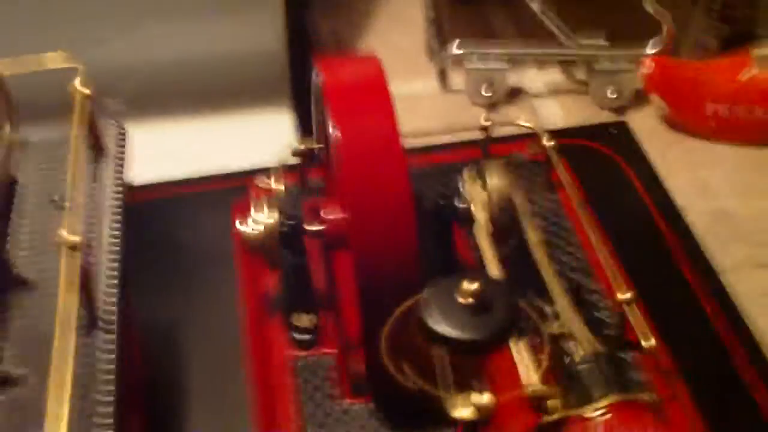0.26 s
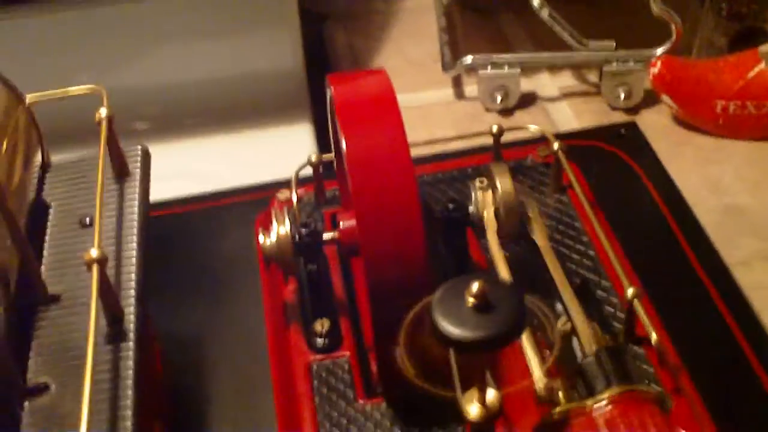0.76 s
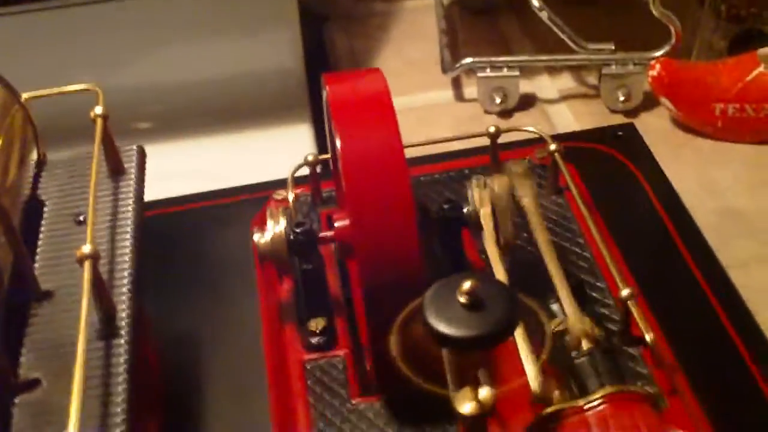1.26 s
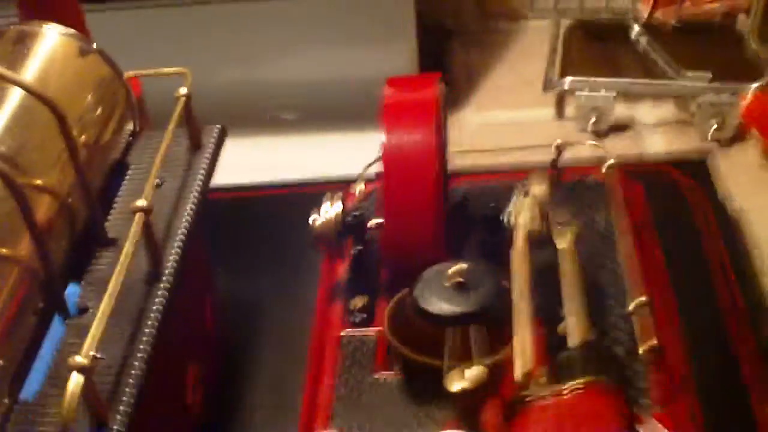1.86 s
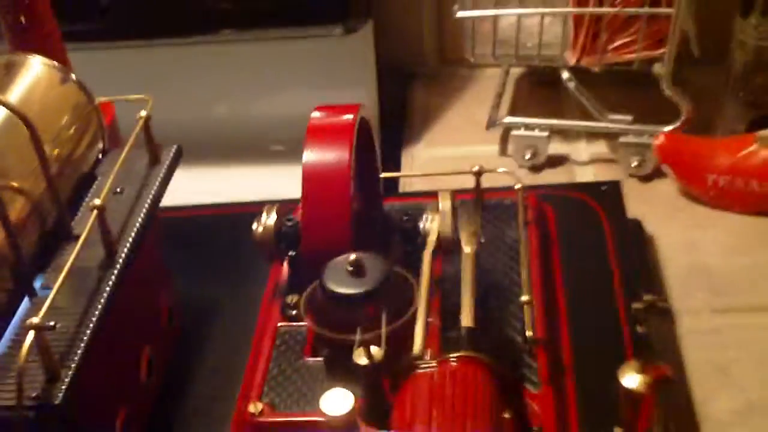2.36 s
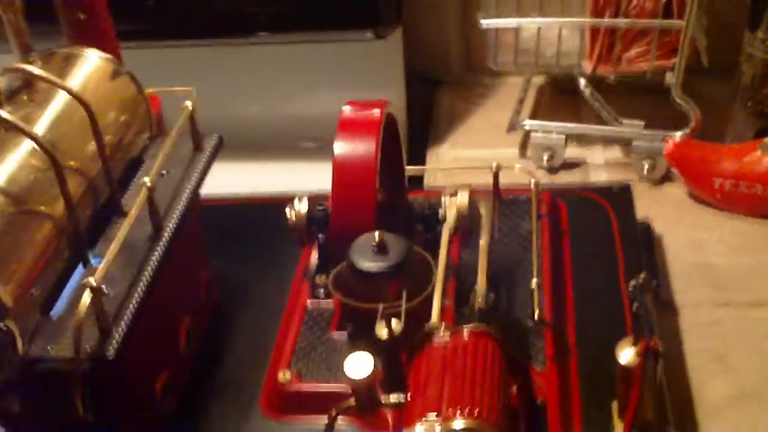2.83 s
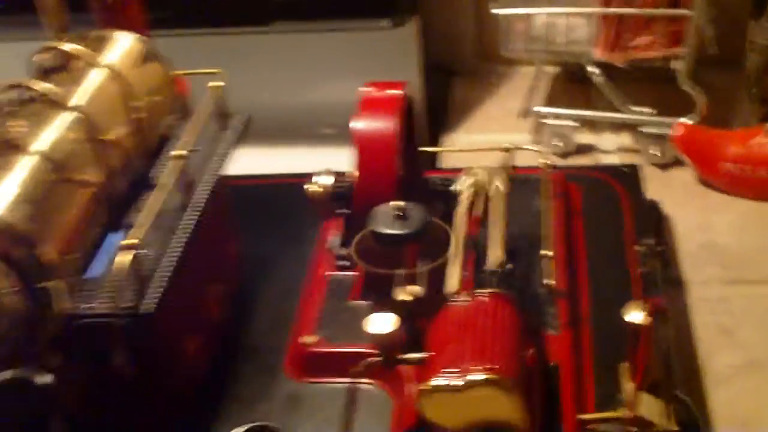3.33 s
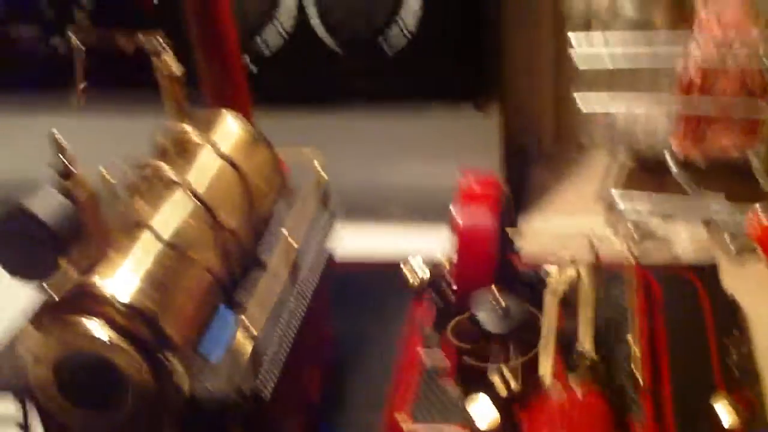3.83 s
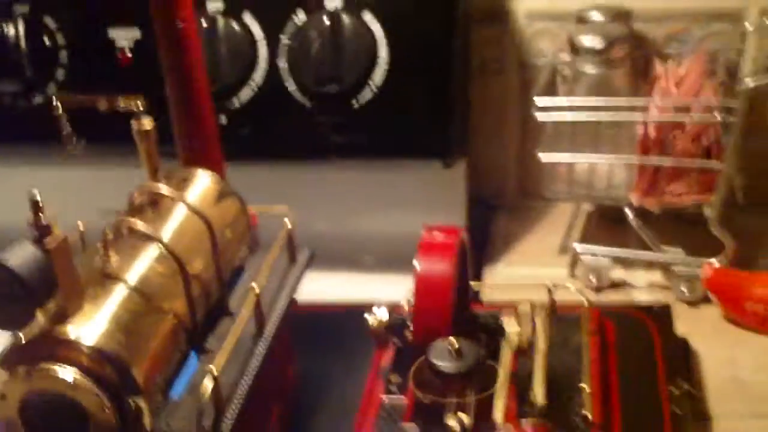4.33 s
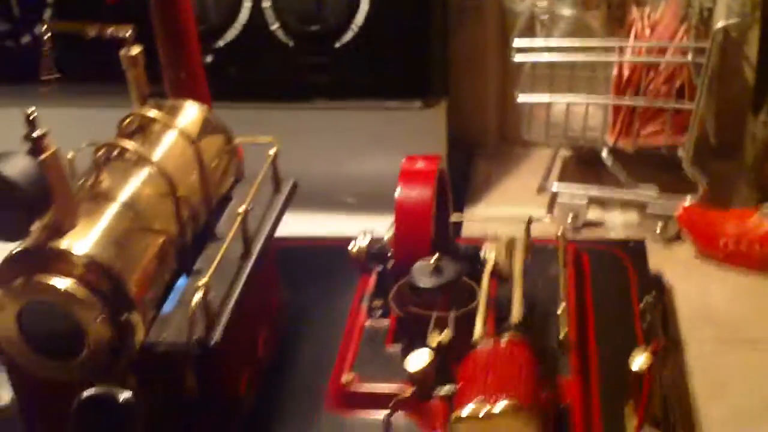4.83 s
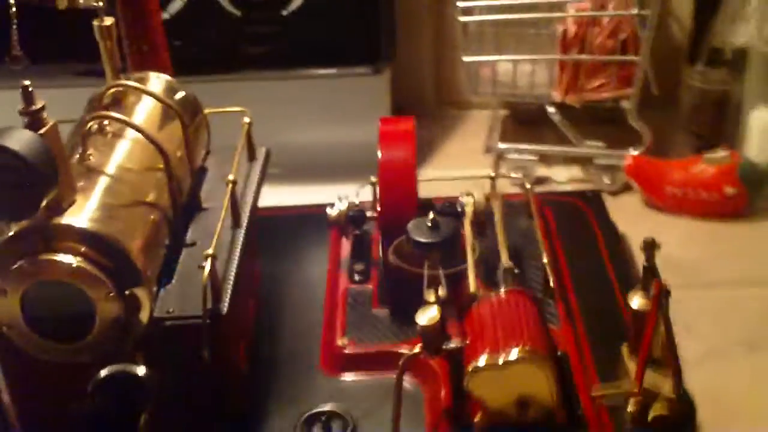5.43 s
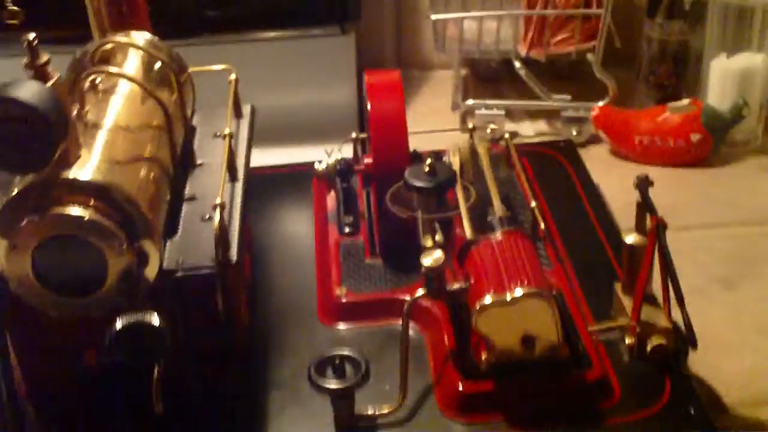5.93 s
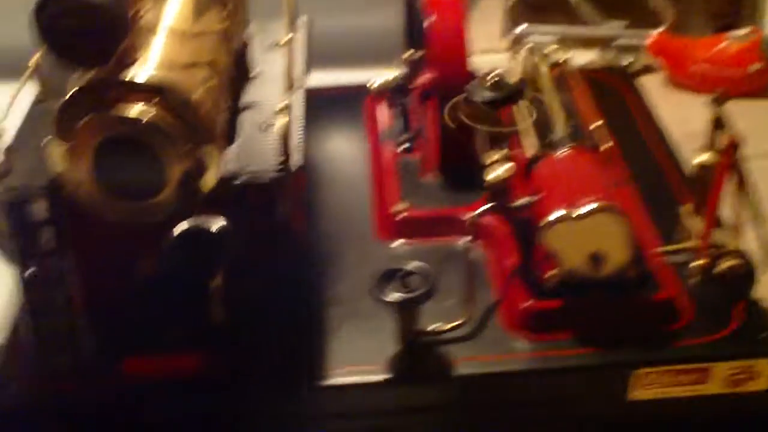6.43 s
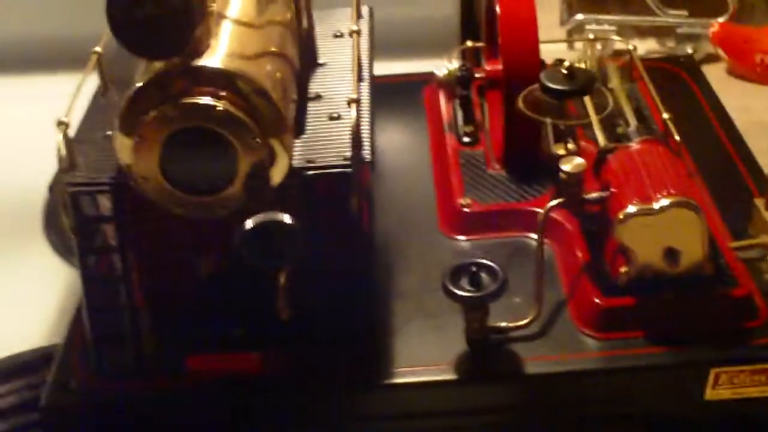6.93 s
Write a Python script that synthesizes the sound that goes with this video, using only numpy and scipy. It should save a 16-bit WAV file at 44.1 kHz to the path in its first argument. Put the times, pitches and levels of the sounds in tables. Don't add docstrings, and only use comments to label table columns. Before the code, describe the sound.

Close handheld phone, hard-walled kitchen: two short, overloaded high whistle toots with hissing steam come in the first second, a weak breathy puff between them. The much quieter toy engine, briefly ducked by the toots, then carries on to the end: low tinny rumble, soft steam hiss, fast even knocking of brass linkage, faint motor and mains hum, slightly nearer toward the close.

```python
import sys
import numpy as np
from scipy import signal
from scipy.fft import rfft, irfft, next_fast_len
from scipy.io import wavfile
from scipy.ndimage import uniform_filter1d

SR = 44100
rng = np.random.default_rng(int(sys.argv[2]) if len(sys.argv) > 2 else 0)


def wav_out(sig):
    wavfile.write(sys.argv[1], SR, np.round(np.clip(np.atleast_2d(sig).T, -1, 1) * 32767).astype(np.int16))


def gain_from_db(level_db):
    decades = np.asarray(level_db, float) / 20
    return 10 ** decades


N = 317079


def ramp(times_s, values):
    return np.interp(np.arange(N) / SR, times_s, values)


def curve(table, column=1):
    table = np.array(table)
    return ramp(table[:, 0], table[:, column])


def unit(x):
    return x / np.sqrt(np.mean(x ** 2))


def butter(x, order, hz, kind="low", rate_hz=SR):
    return signal.sosfilt(signal.butter(order, hz, kind, fs=rate_hz, output="sos"), x)


def walk(rate_hz):
    hold = int(SR / rate_hz)
    held = np.repeat(rng.standard_normal(N // hold + 1), hold)
    return unit(uniform_filter1d(uniform_filter1d(held, hold), hold)[:N])


def bursts(events, edge_ms):
    out = np.zeros(N)
    for start_s, length_ms, db in events:
        a, b = int(max(start_s, 0) * SR), int((start_s + length_ms / 1000) * SR)
        out[a:b] = np.maximum(out[a:b], gain_from_db(db))
    edge = max(int(edge_ms * SR / 1000), 1)
    return uniform_filter1d(uniform_filter1d(out, edge), edge)


def noise_spectrum(colour):
    hz, db = np.transpose(colour)
    bins_hz = np.arange(N // 2 + 1) * SR / N + 1
    noise = rfft(rng.standard_normal(N)) * gain_from_db(np.interp(np.log(bins_hz), np.log(hz), db))
    return noise / np.std(irfft(noise, N))


LOUD = (0, 3)


def ducked(back_s):
    hold_s = 0.097
    ducks = []
    for _, full, _, shuts, _ in np.array(BLASTS)[list(LOUD)]:
        ducks.append(ramp([full - .02, full, shuts + hold_s, shuts + hold_s + back_s], [0, 1, 1, 0]))
    return np.max(ducks, axis=0)


# multiple of shaft rate, level in dB.
FAN_LINES = [(1, -23), (3, -21), (4, -15), (5, -16), (6, -27), (8, -27), (9, -22), (10, -26), (11, -10),
             (12, -26), (13, -18), (14, -11), (15, -11), (16, -16), (17, -28), (18, -20), (21, -28)]
# frequency in Hz, level in dB.
MAINS_LINES = [(120, -25), (240, -30), (360, -14), (480, -30), (720, -28)]


def motors():
    fan_hz = 57.925
    lines = [(k * fan_hz, db) for k, db in FAN_LINES] + list(MAINS_LINES)
    t = np.arange(N) / SR
    out = np.zeros(N)
    for hz, db in lines:
        level = 2 ** .5 * gain_from_db(db - 1.0 + 3.3 * walk(3.5))
        out += level * np.sin(2 * np.pi * (hz * t + rng.random()))
    return out


# share of turn 0-1, level in dB.
KNOCKS = [
    (0, 0),
    (.5, -3.5),
    (.83, -11),
]
# frequency in Hz, level in dB per Hz.
KNOCK_COLOUR = [(700, -30), (1400, -10), (1900, -4), (2800, 0), (3300, -2), (4000, -14), (4900, -5),
                (5600, -9), (7000, -22), (10000, -40)]


def linkage():
    turn_hz, first_s, jitter_s = 5.7465, -.001, 0.001466
    turns = np.arange(1, int(N / SR * turn_hz))
    blows = np.zeros(N)
    for share, db in KNOCKS:
        at_s = first_s + (turns + share) / turn_hz + jitter_s * rng.standard_normal(len(turns))
        blows[(at_s * SR).astype(int)] = gain_from_db(db + .6 * rng.standard_normal(len(turns)))
    t = np.arange(4000) / SR
    decay = np.clip(t / .003, 0, 1) * (np.exp(-t / .007) + .6 * np.exp(-t / .022))
    scuff = signal.fftconvolve(blows, decay)[:N] * irfft(noise_spectrum(KNOCK_COLOUR), N)
    return unit(butter(scuff, 2, 6000))


# frequency in Hz, level in dB per Hz.
BODY = [(18, -40), (30, -26.5), (217, -11.5), (397, -6.5), (885, -3), (1580, -14), (2730, -17.5),
        (3880, -25), (6740, -27.5), (9110, -30.5), (12000, -39), (15600, -86), (22000, -120)]
# centre in Hz, width in Hz, gain in dB.
TIN = [(99, 30, 5), (226.7, 73, 7), (265, 28, -4.5), (394.5, 30, -2), (557, 38, 4), (730, 60, 3),
       (784, 27.7, -5.5), (835, 69.6, 2), (930.5, 40, 2.5), (1014, 38, -6), (1040, 25, 3.5),
       (1796, 81, 5.5), (2740, 290, -0.5), (3980, 360, 0), (4611, 400, 4), (5270, 400, -5), (6470, 1500, 5),
       (929, 9, 5), (3880, 54.6, -8), (10100, 700, 2), (10310, 120, -11.5)]
# time in seconds, nearness in dB.
NEAR = [
    (0, 3.5),
    (.5, 1.5),
    (1.5, 0.95),
    (3.35, -0.5),
    (3.5, 1.5),
    (4.2, 0.9),
    (4.5, 2.5),
    (7.19, 3),
]


def running():
    hz = np.arange(N // 2 + 1) * SR / N + 1
    tin_db = sum(db / (1 + (2 * (hz - f) / width) ** 2) for f, width, db in TIN)
    noise = noise_spectrum(BODY) * gain_from_db(tin_db)
    near = curve(NEAR)
    bright_duck = -10.5 * ducked(back_s=0.38)
    rumble_db = near - 9 * ducked(back_s=0.26)
    rattle_db = 0.98 * near + bright_duck
    hiss_db = 1.1 * near + bright_duck
    out, swell = 0, walk(4)
    for centre_hz in 28 * 2 ** np.arange(0, 9, 1 / 3):
        octaves = np.log2(hz / centre_hz)
        band = irfft(noise * np.cos(np.pi / 2 * np.clip(3 * octaves, -1, 1)) ** 2, N)
        near_db = hiss_db if centre_hz > 3900 else rattle_db if centre_hz > 1450 else rumble_db
        out = out + band * gain_from_db(near_db + 0.66 * swell + 0.48 * walk(7))
    knocks = gain_from_db(rattle_db - 15.2) * linkage()
    return gain_from_db(-45) * (gain_from_db(0.95) * out + knocks + gain_from_db(rumble_db) * motors())


def echo_gain():
    under_db, rebound_db, settle_s = -10, 4, 0.023
    t, db = np.arange(N) / SR, -10.5
    for opens, _, eases, shuts, _ in np.array(BLASTS)[list(LOUD)]:
        ends = shuts - .22 * (shuts - eases)
        db = db + under_db * ramp([opens, opens + .01, ends - .01, ends], [0, 1, 1, 0])
        rebound = ramp([ends - .01, ends], [0, 1]) * np.exp(-np.maximum(t - ends, 0) / settle_s)
        db = db + rebound_db * rebound
    slip_s, recovery_s, dip_db, lasting_db = .866, .022, -13, 0
    return db + ramp([slip_s, slip_s + .006, slip_s + .006 + recovery_s], [0, dip_db, lasting_db])


def kitchen_echo(dry):
    t = np.arange(SR // 3) / SR
    decay = 1000. ** (-t / 0.59) + 2.455 * 1000. ** (-t / 0.16)
    room = rng.standard_normal(len(t)) * decay * np.clip(t / 0.01, 0, 1)
    room = room / np.sqrt(np.sum(room ** 2))
    octave = dry ** 2 - uniform_filter1d(dry ** 2, size=48)
    sideways = dry + gain_from_db(-22) * octave
    pressure = sum(ramp([o, f, e, s], [0, 1, 1, 0]) for o, f, e, s, _ in BLASTS)
    beamed = sideways * gain_from_db(-4 * pressure)
    echo = butter(signal.fftconvolve(beamed, room)[:N], 1, 7000)
    return gain_from_db(echo_gain()) * echo


def wheeze():
    breath = unit(butter(rng.standard_normal(N), 2, (3300, 3600), "band"))
    return gain_from_db(-41.5 + ramp([.284, .292, .326, .526], [-50, 0, 0, -44.55])) * breath


# start in seconds, length in ms, level in dB.
PUFFS = [
    (0, 52.7, -24.5),
    (.282, 10, -41),
    (.292, 44.3, -37),
    (.625, 29, -35.5),
    (.655, 68, -26),
    (.725, 22, -37.5),
]
# frequency in Hz, level in dB per Hz.
LIP = [(900, -46.5), (1500, -18.5), (3000, -15), (3900, -17), (4700, -10.5), (5200, -19.5), (6500, -2),
       (7400, -12.5), (8400, -18), (10700, -18.5), (12000, -25.5), (15000, -59)]


def steam():
    gust = bursts(PUFFS, edge_ms=9.5)
    pole = 1 / (.03 * SR)
    gust = gust + .15 * signal.lfilter([pole], [1, pole - 1], gust)
    return gust * gain_from_db(1.5 * walk(150)) * irfft(noise_spectrum(LIP), N)


# time in seconds, pitch in Hz, level in dB.
SQUEAL = [
    (0, 11740, -13),
    (.008, 11720, -15),
    (.012, 11530, -18),
    (.033, 11450, -18),
    (.045, 11450, -45),
]


def valve_squeal():
    level = gain_from_db(curve(SQUEAL, column=2) + 2.0 + 1.5 * walk(400))
    tone = np.sin(2 * np.pi * np.cumsum(curve(SQUEAL)) / SR)
    return level * tone * (np.arange(N) < .05 * SR)


# valve opens, full pressure, eases, shuts, all in seconds, top pitch in Hz.
BLASTS = [
    (-.025, .015, .045, .068, 4739),
    (.278, .292, .322, .345, 4600),
    (.62, .626, .63, .65, 4650),
    (.641, .685, .705, .762, 4633),
]
# time in seconds, level in dB over full scale.
TONE = [
    [(0, -17), (.012, -14), (.023, -2), (.052, -2.5), (.067, -5), (.071, -40)],
    [(.279, -60), (.282, -37), (.289, -37), (.293, -60), (.326, -60), (.33, -36), (.338, -36), (.342, -60)],
    [(.625, -50), (.628, -30), (.635, -30), (.638, -50)],
    [(.637, -40), (.645, -3.5), (.654, -2), (.661, -5), (.665, -1), (.72, -1.5), (.741, -4), (.76, -16),
     (.767, -40)],
]
# start in seconds, length in ms, level in dB.
SURGES = [(.0246, 4.4, 3), (.0295, 5, -.3), (.0352, 1, .8), (.038, 1.2, .8), (.040, 4.8, 3),
          (.6543, .7, .5), (.6655, .8, .6), (.6686, 3.4, 2), (.6738, 1.8, .6), (.6807, .8, .8),
          (.6828, 14, 3), (.699, 13, 3), (.7125, 3, .3), (.716, 3, 1.5)]


def pipe():
    sag_hz = 570
    beat_share, beat_depth, beat_starts = .75, .85, (.55, 0, 0, .1)
    out, surge = 0, bursts(SURGES, edge_ms=.2)
    for (opens, full, eases, shuts, top_hz), level, start in zip(BLASTS, TONE, beat_starts):
        rise, fall = ramp([opens, full], [1, 0]), ramp([eases, shuts], [0, 1])
        pitch_hz = top_hz - sag_hz * (rise + fall) ** 2 + 4 * walk(300)
        phase = 2 * np.pi * np.cumsum(pitch_hz) / SR
        turns = start + beat_share * np.cumsum(sag_hz * fall ** 2) / SR
        beat = 1 - beat_depth * np.minimum(5 * fall, 1) * (1 - np.abs(np.cos(np.pi * turns)))
        sputter_db = 5 * (opens < 0) * np.minimum(4 * rise, 1) * walk(500)
        tone = gain_from_db(curve(level) + .5 * walk(400) + sputter_db) * beat
        first, last = level[0][0], level[-1][0]
        inside = ramp([first - .001, first, last, last + .001], [0, 1, 1, 0])
        blow = inside * np.maximum(tone, surge)
        out = out + blow * (np.sin(phase) + gain_from_db(-35) * blow * np.sin(2 * phase))
    return out


def whistle():
    dry = pipe() + steam() + wheeze() + valve_squeal()
    return dry + kitchen_echo(dry)


def scene():
    return (gain_from_db(2) * running() + whistle())[None]


def drop_masked(x, quiet_db, near_db, slope_db):
    z = signal.stft(x, nperseg=512)[2]
    fine_power = np.abs(z[:256]) ** 2
    power = fine_power.reshape(64, 4, -1).sum(axis=1)
    above = np.subtract.outer(np.arange(64), np.arange(64))
    spread = np.where(above > 0, gain_from_db(near_db - slope_db * above), 0) ** 2
    spread = spread + gain_from_db(quiet_db) ** 2 * (np.arange(64)[:, None] > 15)
    shift = gain_from_db(7 * rng.standard_normal((power.shape[1] // 5 + 1, 64)))
    shift = np.repeat(shift, 5, axis=0).T[:, :power.shape[1]]
    bar = np.repeat(shift * (spread @ power), 4, axis=0)
    keep = 4 * uniform_filter1d(fine_power, size=3, axis=1) > bar
    return signal.istft(z * np.vstack([keep, keep[-1:]]), nperseg=512)[1][:len(x)]


def low_pass(x):
    return signal.sosfilt(signal.butter(12, 15900, fs=SR, output="sos"), x)


def record(dry):
    hold_hz, top_hz = 24000, 15290
    x = signal.resample_poly(dry[0], hold_hz // 300, SR // 300)
    envelope = np.abs(signal.hilbert(x, next_fast_len(len(x)))[:len(x)])
    reach = uniform_filter1d(envelope, size=6)
    x = x * np.minimum(1, 1.1 / (reach + 1e-9))
    overflow = (x + 1) % 2 - 1 - x
    bass_cut = signal.butter(1, 190, "high", fs=hold_hz, output="sos")
    x = x + signal.sosfiltfilt(bass_cut, overflow)
    x = drop_masked(x, quiet_db=-41.5, near_db=-18, slope_db=3.5)
    x = signal.resample_poly(np.repeat(x, 2), SR // 300, 2 * hold_hz // 300)[:N]
    x = np.pad(x, (0, N - len(x))) * gain_from_db(-3.5)
    x = signal.sosfiltfilt(signal.ellip(9, .1, 25, top_hz, fs=SR, output="sos"), x)
    return low_pass(x[None])


dry = scene()
out = record(dry)
wav_out(out)
```